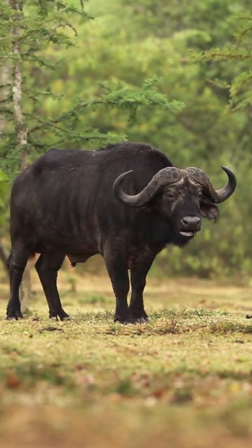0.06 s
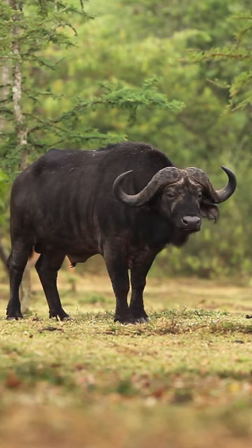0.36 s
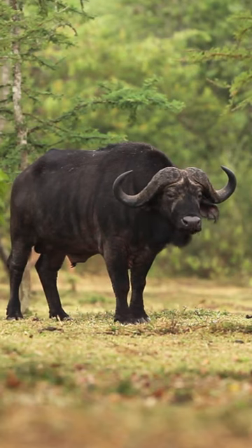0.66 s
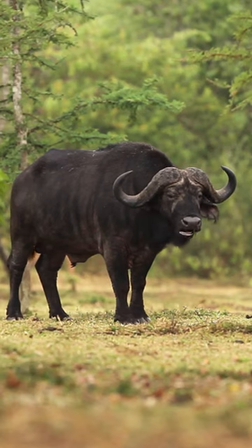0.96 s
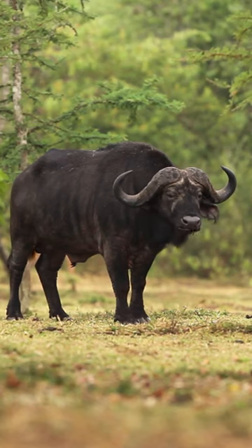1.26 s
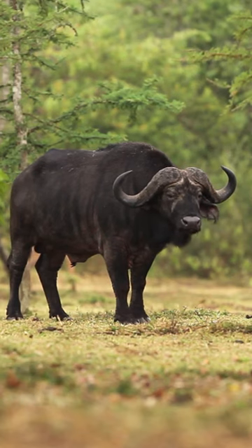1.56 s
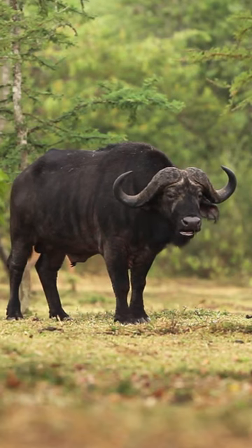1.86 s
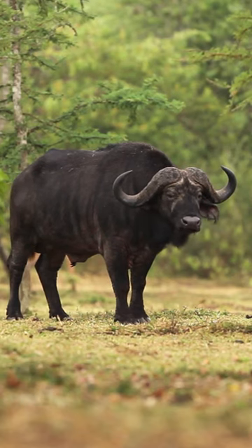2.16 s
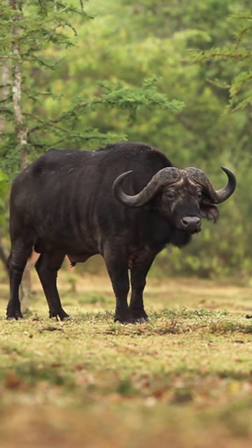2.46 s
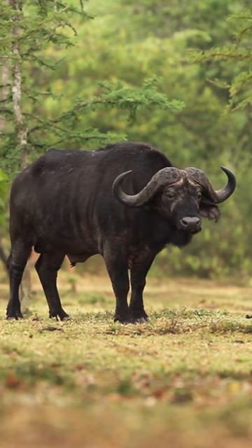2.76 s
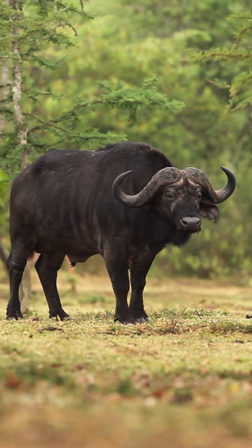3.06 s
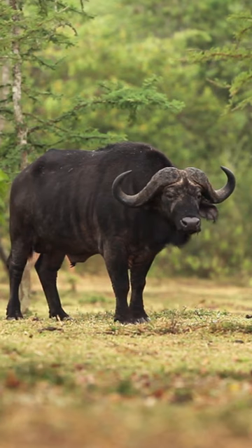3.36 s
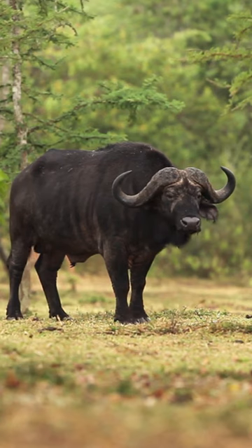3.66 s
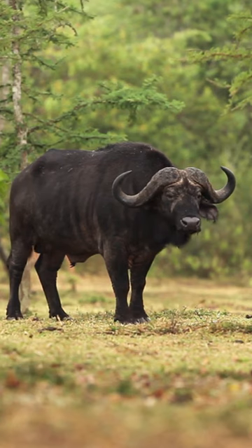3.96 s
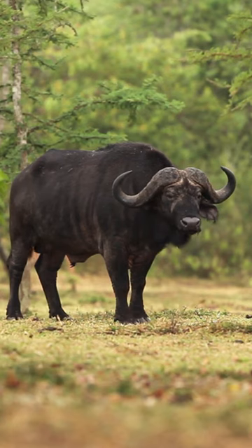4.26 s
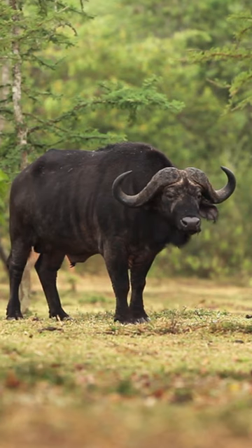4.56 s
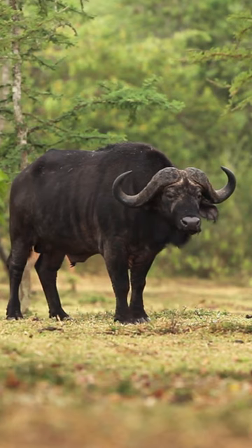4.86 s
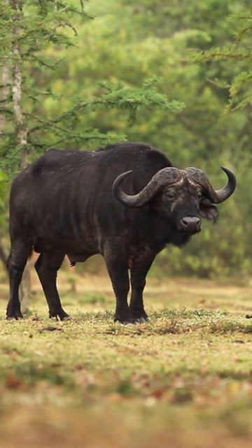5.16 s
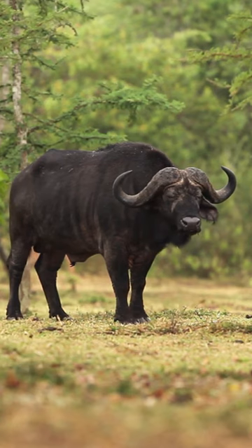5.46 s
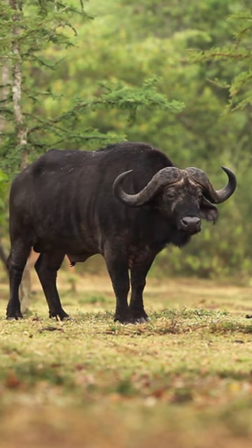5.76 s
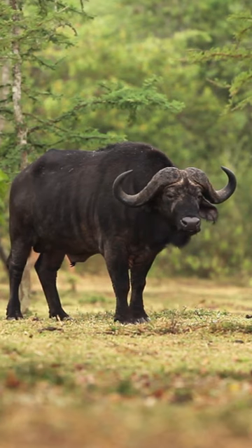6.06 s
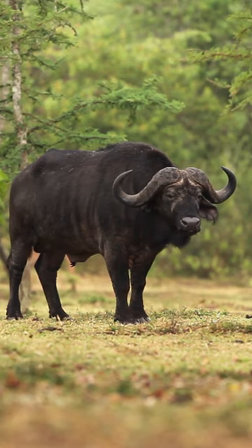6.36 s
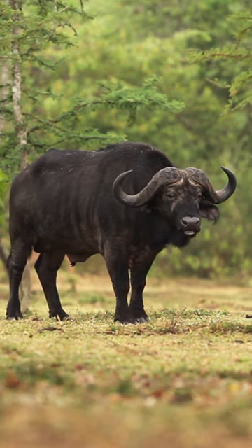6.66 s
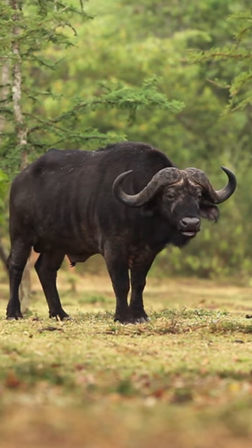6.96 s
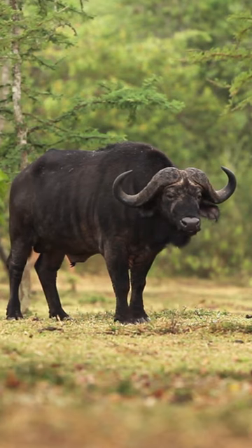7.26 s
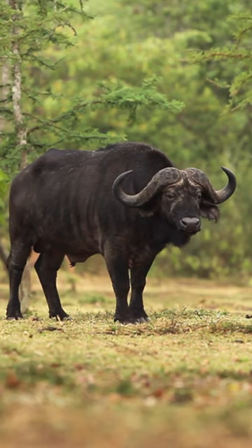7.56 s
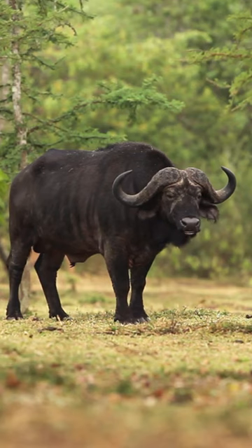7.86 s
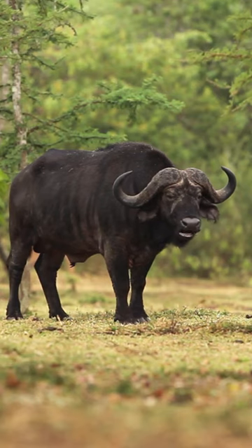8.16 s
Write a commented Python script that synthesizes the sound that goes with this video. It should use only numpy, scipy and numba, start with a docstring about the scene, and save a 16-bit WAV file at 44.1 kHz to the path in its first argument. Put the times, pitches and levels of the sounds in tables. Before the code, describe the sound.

Birds chirp and trill on both sides at the edge of a wood, over a soft hush and a faint low rumble. Straight ahead, a buffalo quietly chews grass, then gives two loud, deep, rattling calls with a short pause between them. The first swells gradually, and the second is breathier. Afterwards the birds carry on and the faint chewing returns.

```python
"""Buffalo at a wood's edge

A buffalo chews and gives two deep, rattling calls. Its vocal folds slap about 22 times a second,
a pulse train that excites the resonances of chest, throat and mouth; air rasps after each slap.
Birds chirp on both sides, their tones scattered by the trees, over a low rumble and the wood's hush."""
import sys
import numpy as np
from scipy import signal
from scipy.fft import rfft, irfft, next_fast_len
from scipy.io import wavfile
from scipy.ndimage import uniform_filter1d, minimum_filter1d
from numba import njit

SR = 44100
rng = np.random.default_rng(int(sys.argv[2]) if len(sys.argv) > 2 else 0)


def int16_out(signal):
    """Quantize to a 16-bit WAV file."""
    q = np.round(np.clip(np.atleast_2d(signal).T, -1, 1) * 32767)
    wavfile.write(sys.argv[1], SR, q.astype(np.int16))


N = 367353
T = np.arange(N) / SR

# vocal fold rate through each call (time [s], rate [slaps/s])
FOLD_RATE_1 = [(2.665, 21.64), (2.85, 21.25), (3.1, 21.67), (3.22, 22.44), (3.6, 22.29), (3.85, 22.53),
               (4.03, 22.08), (4.15, 21.07)]
FOLD_RATE_2 = [(4.931, 21.95), (5.0, 19.97), (5.1, 21.28), (5.4, 22.51), (5.6, 22.24), (5.85, 21.81),
               (6.05, 23.04), (6.4, 22.47), (6.64, 20.87)]
# how hard each call is pushed (time [s], throat drive [dB], chest drive [dB])
EFFORT_1 = [(2.66, -56, -60), (2.76, -42, -36.5), (3.17, -38.5, -29), (3.27, -30.5, -28), (3.41, -16, -38),
            (3.8, -12, -28), (3.935, -12, -23.5), (4.12, -20.5, -17)]
EFFORT_2 = [(4.93, -40, -34), (5.07, -29, -14.5), (5.13, -33, -24), (5.19, -26.5, -24), (5.44, -23.5, -19),
            (5.56, -16.5, -19.5), (5.71, -24, -19.5), (5.89, -36, -26), (6.025, -14.5, -24),
            (6.16, -8.5, -26), (6.33, -14.5, -19.5), (6.43, -19, -24), (6.61, -24, -15)]
# the throat lengthens and shortens (time [s], second resonance [Hz])
TUNING_1 = [(2.66, 560), (3.15, 512), (3.4, 474), (3.75, 452), (3.95, 465.5), (4.13, 453)]
TUNING_2 = [(5.1, 440), (5.2, 394), (5.6, 398), (5.8, 387), (6.03, 406), (6.3, 426), (6.6, 446)]
# mouth resonances at rest (frequency [Hz], bandwidth [Hz], relative level [dB])
MOUTH_MODES_1 = [(821, 86, 1), (909, 130, 7), (1010, 98, 5.5), (1200, 160, -0.5), (1390, 68, -2.5),
                 (1580, 150, -17)]
MOUTH_MODES_2 = [(668, 19, 12), (873, 125, 12.5), (988, 27, 4), (1353, 58, 9.5), (1573, 89, 8.5),
                 (1780, 190, -21)]
# slaps that knock harder in the mouth (time [s], boost [dB])
HARD_SLAPS = [(2.853, 4), (3.716, 2), (3.936, 0.5), (3.981, 2.5), (4.07, 3), (4.118, 7.5), (6.068, 5),
              (6.201, 3), (6.245, 4), (6.334, 4)]
# hiss of air through the muzzle (frequency [Hz], relative level [dB])
HISS_SPECTRUM = [(300, -34.5), (650, -18), (900, 6.5), (2200, 4.5), (3600, -7), (4400, -8), (5200, -8),
                 (6500, -16), (8800, -20.5), (12000, -27), (16000, -35)]
# gusts in the throat (start [s], duration [s], resonance [Hz], nominal bandwidth [Hz], level [dB])
THROAT_GUSTS = [(4.12, .11, 330, 350, -37), (4.92, .07, 115, 30, -34), (4.95, .08, 280, 200, -43),
                (5.15, .12, 880, 90, -40), (5.168, .018, 850, 160, -28), (6.61, .07, 330, 200, -43)]
# jaw strokes (start [s], duration [s], level [dB])
JAW_STROKES = [(.34, 0.18, -46.5), (1.24, 0.19, -47.5), (2.25, 0.16, -49), (8.2, 0.16, -46)]
# resonances of the closed mouth (frequency [Hz], bandwidth [Hz], relative level [dB])
CLOSED_MOUTH_MODES = [(323, 87, 5), (807, 170, -3.5)]
# grass crunching between the teeth (start [s], duration [s], level [dB])
GRASS_CRUNCHES = [(.25, 0.093, -52.5), (.77, 0.084, -51), (.85, 0.05, -48.5), (1.73, 0.08, -52.5),
                  (1.8, 0.047, -48), (7.63, 0.056, -54), (7.73, 0.048, -50)]
# bird notes (start [s], duration [s], kind, pitch [Hz], level [dB], left minus right [dB])
BIRD_NOTES = [(.188, 0.11, "arch", 2653, -36.5, -7), (0.306, .12, "droop", 2290, -43.5, -8.5),
              (0.797, 0.076, "fall", 3350, -47.5, 11), (.8, 0.14, "lift", 2666, -39, -6),
              (0.902, 0.046, "arch", 3800, -45, -8), (0.923, 0.065, "swoop", 2906, -33, -7.5),
              (0.964, 0.036, "rise", 2644, -40.5, -10.5), (0.999, 0.046, "droop", 4420, -53, -3),
              (1.131, 0.033, "fall", 6250, -55.5, -19), (1.271, 0.03, "swoop", 5640, -48.5, -2),
              (1.376, .043, "fall", 2890, -40, -6), (1.385, 0.08, "rise", 3464, -41.5, -1.5),
              (1.463, 0.079, "droop", 2082, -40.5, -3), (1.53, 0.052, "dip", 4420, -46, -4),
              (1.574, 0.038, "dip", 4840, -38, -3), (1.618, 0.027, "dip", 4860, -36, -3),
              (1.659, 0.027, "dip", 5080, -38, -1), (1.78, 0.079, "hook", 2830, -48.5, -5),
              (1.907, 0.11, "swoop", 2946, -39.5, -0.5), (1.973, 0.078, "hook", 3350, -43.5, -4),
              (2.034, 0.059, "fall", 3180, -37.5, -6), (2.153, 0.038, "arch", 4830, -41.5, -2),
              (2.176, .1, "sag", 3825, -35.5, -1.5), (2.37, 0.087, "swoop", 2640, -49, -18),
              (2.472, 0.1, "arch", 2357, -38, -8), (2.573, 0.1, "hook", 2780, -30, -4.5),
              (2.614, 0.072, "lift", 3760, -37.5, -4.5), (2.681, 0.073, "swoop", 3680, -41, -2),
              (2.979, 0.063, "hook", 2314, -37.5, -11.5), (3.035, 0.037, "sag", 3210, -42.5, -16),
              (3.044, 0.076, "droop", 2200, -40, -6), (3.152, 0.028, "arch", 2870, -31.5, -10),
              (3.164, 0.059, "vee", 2760, -33, -7.5), (3.535, 0.097, "hook", 3110, -47.5, 10),
              (3.791, 0.084, "arch", 2500, -35.5, -9), (3.886, 0.089, "droop", 2550, -36, -7.5),
              (4.248, 0.053, "held", 6160, -56.5, 6), (4.368, 0.039, "sag", 3590, -39.5, -3),
              (4.427, 0.065, "vee", 2920, -39, -18), (4.502, 0.12, "climb", 2195, -50.5, 8),
              (4.478, .43, "held", 3925, -46, 11.5), (4.669, 0.094, "sag", 2660, -53, 8),
              (4.914, 0.048, "rise", 2297, -42.5, -8), (4.973, 0.033, "sag", 3120, -36.5, -5),
              (4.976, 0.075, "sag", 4960, -47, 11), (4.983, 0.054, "droop", 2210, -45, -9),
              (5.068, 0.071, "sag", 4870, -45.5, 9), (5.082, .076, "vee", 2700, -33.5, -10),
              (5.164, .2, "rise", 4050, -40, 16.5), (5.388, 0.074, "fall", 4110, -40.5, 15),
              (5.469, 0.12, "dip", 4720, -46, -3), (5.559, 0.082, "fall", 3440, -37.5, -4),
              (5.618, .15, "sag", 4100, -49, 15), (5.824, 0.14, "swoop", 4020, -43.5, 1),
              (5.79, 0.13, "rise", 7300, -62, 2.5), (6.025, 0.079, "arch", 2707, -33, -7),
              (6.19, 0.051, "arch", 4760, -42, -3.5), (6.231, 0.081, "rise", 4185, -42, -4.5),
              (6.272, 0.13, "sag", 2290, -46, 19), (6.379, 0.056, "fall", 3600, -42.5, -3.5),
              (6.434, .035, "droop", 3460, -44, -4), (6.47, .04, "droop", 3470, -47, -5),
              (6.516, 0.047, "droop", 3390, -44, -5), (6.559, 0.064, "fall", 3920, -43.5, 18),
              (6.553, 0.14, "lift", 2730, -34, -7.5), (6.666, 0.026, "arch", 3670, -39.5, -11),
              (6.68, 0.064, "swoop", 2640, -33.5, -3), (6.751, 0.13, "sag", 2497, -48, 13),
              (7.106, 0.076, "arch", 2330, -38, -8), (7.191, 0.09, "hook", 2843, -30, -5),
              (7.3, 0.079, "sag", 2300, -44.5, 10), (7.31, 0.1, "sag", 2940, -50, 7),
              (7.385, 0.071, "sag", 2390, -47, 24), (7.63, 0.041, "lift", 3340, -43, -8),
              (7.668, 0.075, "fall", 5030, -49.5, -6), (7.74, 0.051, "vee", 3260, -40.5, -3),
              (8.063, 0.16, "climb", 2527, -39, -11.5), (8.213, .1, "hook", 2950, -39.5, -5),
              (8.2, 0.086, "sag", 6370, -61, -14)]
# bird trills (start [s], duration [s], pitch [Hz], deviation [Hz], modulation rate [Hz],
# level [dB], left minus right [dB])
BIRD_TRILLS = [(0.183, 0.22, 5660, 90, 75, -63, 0), (1.547, 0.15, 5210, 590, 54, -48, -1),
               (2.286, 0.38, 5540, 345, 12.7, -62.5, 1), (5.56, 0.25, 4080, 330, 125, -44.5, 12),
               (6.423, 0.14, 3460, 413, 22, -45.5, -3.5)]
# contour of each kind of note (four successive pitches [semitones], swell from start to end [dB])
NOTE_CONTOURS = {"arch": ((-5, 0.84, 1, -3), 2.5), "hook": ((-1.4, 1.2, -0.22, -1.4), 3.1),
                 "droop": ((1.5, 1, -1.5, -6.5), -2.5), "fall": ((5.5, 1.6, -1.2, -3.5), 8.1),
                 "swoop": ((5.5, -0.5, -3.5, -.5), 0), "dip": ((1.1, -0.83, -0.8, 1.4), -5.5),
                 "vee": ((3.5, -1.3, -3, 4.5), 3.6), "rise": ((-2.5, -0.1, .5, -0.7), 6),
                 "lift": ((0, 0, 1.57, 6), 3.2), "sag": ((0.91, 0, -.4, -0.78), -1),
                 "climb": ((-3.5, -1.2, 0.8, 4.5), 5), "held": ((0.041, 0.1, -0.028, -0.16), 10)}
# overtones of a bird note (harmonic number, relative level [dB])
BIRD_HARMONICS = [(2, -32), (3, -23), (4, -26)]
# low rumble, sinking during the first call and returning after the second (time [s], level [dB])
RUMBLE_LEVEL = [(0, -46.5), (.25, -41), (.55, -49.5), (1.1, -45), (2.8, -44), (4.2, -76), (6.65, -80.5),
                (6.8, -50.5), (7.5, -52.5), (7.65, -45), (8.33, -42.5)]
# far birds merging into a chorus (time [s], level [dB])
CHORUS_LEVEL = [(0, -59.5), (1.6, -53.5), (3.1, -55.5), (4.3, -64.5), (5.4, -51), (6.5, -52.5), (7, -57.5),
                (8.33, -63.5)]
# background spectra (frequency [Hz], relative level [dB])
RUMBLE_SPECTRUM = [(15, -10.5), (30, 1), (45, 1.5), (65, -7.5), (100, -12.5), (150, -21), (250, -26),
                   (500, -32), (1200, -36), (3000, -58.5)]
CHORUS_SPECTRUM = [(1200, -30), (2000, -2), (2700, 3.5), (3800, 0.5), (4600, -5), (5600, -19.5),
                   (7000, -29.5)]
HUSH_SPECTRUM = [(59, -30.5), (100, -6), (156, -5.5), (420, -5.5), (668, -11.5), (1490, -10.5), (1960, -7),
                 (2810, -3.5), (3850, -35.5), (5070, -16.5), (7410, -24.5), (8230, -17.5), (10600, -24),
                 (14500, -22), (15500, -43)]


def buffalo():
    """Source and filter: a swelling call, then a breathier one, with brief scattering from the trees."""
    first = call(
        FOLD_RATE_1, EFFORT_1, TUNING_1, closes_s=0.017, opens_s=0.25, open_mouth_db=5,
        throat=dict(open_rise_hz=69.5, second_db=-18, soft_hz=298, churn_db=-1),
        mouth=dict(modes=MOUTH_MODES_1, rest_hz=465, stretch=0.9, top_hz=1843,
                   gain_db=-19.5, rasp_db=-5, clack_db=-8.5, leak=0.29, gust=0.13),
        muzzle=dict(gain_db=-32.5, leak=0.15, nostril_db=0.5))
    second = call(
        FOLD_RATE_2, EFFORT_2, TUNING_2, closes_s=0.24, opens_s=0.26, open_mouth_db=-5.5,
        throat=dict(open_rise_hz=25, second_db=-21, soft_hz=199, churn_db=-4.5),
        mouth=dict(modes=MOUTH_MODES_2, rest_hz=412, stretch=1.25, top_hz=1790,
                   gain_db=-20.5, rasp_db=-4, clack_db=-3.5, leak=0.24, gust=0.036),
        muzzle=dict(gain_db=-44.5, leak=0.62, nostril_db=-12))
    voice = first + second + grunts()
    return voice + undb(-13.5) * scatter(band(voice, 220, 6000, order=2), t60=0.16)


def call(rate, effort, tuning, closes_s, opens_s, open_mouth_db, throat, mouth, muzzle):
    """Impulse excitation: each slap rings chest and throat and lets a burst of air through the mouth."""
    start, end = rate[0][0], rate[-1][0]
    folds = vocal_folds(rate)
    throat_db, chest_db = curves(effort)
    second_hz, = curves(tuning)
    # the throat is slack at first, closes for the body of the call and opens at its end
    ending = ramp(end - opens_s, opens_s)
    slack = 1 - ramp(start + closes_s, 0.032) + ending
    body = chest_and_throat(folds, throat_db, chest_db, second_hz, slack, ending, **throat)
    flow = uniform_filter1d(folds["sounding"] * 1.0, 900) * undb(3.6 * walk(160))
    push = undb(throat_db + open_mouth_db * ending + knocks())
    loose = ramp(5.15, 0.0066) * (1 - ramp(6.33, 0.072))  # air escapes freely in the second call
    rasp = mouth_rasp(folds, flow, push, loose, second_hz, **mouth)
    return body + rasp + muzzle_hiss(folds, flow, push, loose, **muzzle)


def vocal_folds(rate):
    """Periodic closure: a unit-power impulse train, with the timing of the folds' cycle."""
    start, end = rate[0][0], rate[-1][0]
    hz, = curves(rate)
    sounding = (T >= start) & (T < end)
    cycles = np.cumsum(hz * sounding) / SR
    closures = np.diff(np.ceil(cycles), prepend=0)
    since_s = T - np.maximum.accumulate(T * closures)
    apart = np.clip((since_s - 0.026) / 0.0043, 0, 1)  # the folds part late in each cycle
    slaps = closures * np.sqrt(SR / hz)
    return dict(slaps=slaps, since_s=since_s, apart=apart, sounding=sounding, started=T >= start)


def chest_and_throat(folds, throat_db, chest_db, second_hz, slack, ending,
                     open_rise_hz, second_db, soft_hz, churn_db, full_db=-11, weak_db=-22):
    """Damped resonance: one chest mode and two throat modes ring down after every slap."""
    slaps = folds["slaps"] * undb(0.5 * walk(20))
    drive = slaps * undb(throat_db + 1.5)
    chest = band(ring(slaps * undb(chest_db), hz=48.5, width_hz=19)[0], 34, 100, order=1)
    # the first throat resonance sinks as the effort drops
    first_hz = 0.3064 * second_hz + 1.1 * (throat_db - full_db) + open_rise_hz * ending
    width_hz = 19.9 + 62 * slack
    windpipe_hz = 30 * folds["apart"]  # parted folds let the windpipe damp the ringing
    first = ring(drive, first_hz, width_hz + windpipe_hz)[1]
    low = band(chest + first, 28, soft_hz, order=1)  # gradual closure softens the low resonances
    # air churns after each slap, so that no two ring alike
    churn = rng.standard_normal(N) * np.exp(-folds["since_s"] / 0.027) * folds["sounding"]
    churn *= undb(throat_db + churn_db)
    # the second resonance only ticks when weakly driven; an open throat lifts it
    damping_hz = 11 + 0.36 * width_hz + 0.5 * windpipe_hz + 2.5 * np.maximum(weak_db - throat_db, 0)
    second = ring((drive + churn) * undb(second_db + 11 * slack), second_hz, damping_hz)[0]
    low -= 0.25 * pick(low, hz=283, width_hz=110)  # the nasal side branch absorbs a band
    low += undb(2) * band(churn, 170, 400, order=3)
    return band(low, 8, 1800, order=2) + band(second, 383, 570, order=2)


def mouth_rasp(folds, flow, push, loose, second_hz,
               modes, rest_hz, stretch, top_hz, gain_db, rasp_db, clack_db, leak, gust):
    """Formant filtering: slaps and rough air excite mouth modes that shift as the neck stretches."""
    burst = np.exp(-folds["since_s"] / 0.009) * folds["started"]
    leakage = (leak + gust * folds["apart"]) * flow
    rasp = 2 * (burst + leakage) * rng.standard_normal(N)
    strength = np.hypot(push * undb(gain_db), loose * undb(-48.5)) * undb(1.8 * walk(22))
    source = (undb(clack_db) * folds["slaps"] + undb(rasp_db) * rasp) * strength
    formants = resonate(source, modes, shift_hz=stretch * (second_hz - rest_hz))
    return band(formants, 0.897 * modes[0][0], top_hz, order=5)


def muzzle_hiss(folds, flow, push, loose, gain_db, leak, nostril_db):
    """Flow noise: air bursts out at each slap, leaks on between slaps and rings in the nostrils."""
    burst = uniform_filter1d(np.exp(-folds["since_s"] / 0.007) * folds["started"], size=40)
    strength = np.hypot(push * undb(gain_db), loose * undb(-51))
    air = 2 * (burst + leak * flow) * noise(HISS_SPECTRUM) * strength
    return air + undb(nostril_db) * pick(air, hz=5340, width_hz=260)


def knocks(lead_s=0.0034, decay_s=0.021):
    """Transient emphasis: a brief boost in dB at each hard slap."""
    return sum(boost_db * ramp(s - lead_s, 0.0024) * np.exp(-((T - s) / decay_s) ** 2)
               for s, boost_db in HARD_SLAPS)


def grunts():
    """Unvoiced excitation: gusts of air sound a throat resonance near the edges of the calls."""
    out = np.zeros(N)
    for s, length, hz, width_hz, db in THROAT_GUSTS:
        mode = [(hz, 2 * width_hz, 0)]
        gust = resonate(resonate(rng.standard_normal(N), mode), mode)
        out += gust * np.sqrt(4 * np.pi * width_hz / SR) * swells([(s, length, db)])
    return out


def chewing():
    """Cavity filtering: the closed mouth muffles the grinding; grass crackles between the teeth."""
    grind = band(resonate(rng.standard_normal(N), CLOSED_MOUTH_MODES), 200, 1600, order=2)
    grind *= undb(2.2 * walk(70))
    grains = rng.standard_normal(N) * undb(5.1 * walk(300))
    crackle = unit(band(grains, 290, 2400, order=2))
    return grind * swells(JAW_STROKES) + crackle * swells(GRASS_CRUNCHES)


def birds(ear_lag_s=0.00024):
    """Interaural time and level differences: each note reaches the nearer ear first and louder."""
    notes = [(s, chirp(*row), pan_db) for s, *row, pan_db in BIRD_NOTES]
    notes += [(s, trill(*row), pan_db) for s, *row, pan_db in BIRD_TRILLS] + chatter()
    direct = np.zeros((2, N + SR))
    for s, note, pan_db in notes:
        for ear, side in enumerate((1, -1)):
            i = int(s * SR) + round(ear_lag_s * SR) * int(side * pan_db < 0)
            direct[ear, i:i + len(note)] += note * np.sqrt(2 / (1 + undb(-side * pan_db) ** 2))
    return among_trees(direct[:, :N])


def chirp(length, kind, pitch_hz, db):
    """Frequency glide: a note follows its contour; the narrower the glide, the purer the tone."""
    semitones, swell_db = NOTE_CONTOURS[kind]
    progress = np.linspace(0, 1, int(length * SR))
    contour = np.polyfit(np.linspace(0, 1, 4), semitones, 3)
    hz = pitch_hz * 2 ** (np.polyval(contour, progress) / 12)
    agility = np.clip(np.ptp(hz) / 900, 0.1, 1)
    return whistle(hz, db, swell_db, waver=0.02 * agility, flutter_db=1 + 2.5 * agility,
                   overtones=agility, edge=min(0.2, 0.04 / length))


def trill(length, hz, deviation_hz, rate_hz, db):
    """Frequency modulation: the pitch swings quickly up and down."""
    t = T[:int(length * SR)]
    return whistle(hz + deviation_hz * np.sin(2 * np.pi * rate_hz * t), db)


def whistle(hz, db, swell_db=0, waver=0.016, flutter_db=3.1, overtones=1, edge=0.19):
    """Random modulation: jitter makes a bird's tone slightly hoarse and smears its faint harmonics."""
    size = len(hz)
    progress = np.linspace(0, 1, size)
    hz = hz * (1 + waver * walk(600, size))
    phase = 2 * np.pi * np.cumsum(hz) / SR
    harmonics = sum(undb(level_db) * np.sin(k * phase) * np.clip((13000 - k * hz) / 1000, 0, 1)
                    for k, level_db in BIRD_HARMONICS)
    tone = np.sin(phase) + overtones * walk(900, size) * harmonics
    fade = np.sin(np.pi / 2 * np.clip(np.minimum(progress, 1 - progress) / edge, 0, 1)) ** 2
    swell = undb(swell_db * progress + flutter_db * walk(83.8, size))
    return undb(db) * unit(tone * fade * swell)


def chatter(count=190, db=-59, low_hz=2200, range_hz=1700):
    """Random arrivals: faint notes from deeper in the wood (start [s], sound, left minus right [dB])."""
    notes, kinds = [], list(NOTE_CONTOURS)
    for when, length, height, side, choice in rng.random((count, 5)):
        s = when * T[-1]
        busy_db = np.interp(s, *np.transpose(CHORUS_LEVEL)) - np.mean(CHORUS_LEVEL, axis=0)[1]
        kind = kinds[int(choice * len(kinds))]
        note = chirp(0.05 + 0.07 * length, kind, low_hz + range_hz * height, db + busy_db)
        notes.append((s, note, 20 * side - 12))
    return notes


def among_trees(direct, trunk_s=0.019):
    """Multipath propagation: direct sound, one trunk's clear echo, then near and far reverberation."""
    mixed = 0.8 * direct + 0.2 * direct[::-1]  # echoes from all around are more even between the ears
    near = np.array([scatter(ear, t60=0.18) for ear in mixed])
    far = np.array([scatter(ear, t60=0.7) for ear in mixed])
    trunk = np.roll(mixed, round(trunk_s * SR), axis=1) * (T > trunk_s)
    return undb(0.65) * direct + undb(-12) * trunk + undb(-7) * near + undb(-11) * far


def scatter(x, t60):
    """Diffuse scattering: dense reflections from trunks and leaves fall 60 dB in t60 seconds."""
    t = T[:SR]
    echo = rng.standard_normal(SR) * undb(-60 * t / t60) * (1 - np.exp(-t / 0.0066))
    return signal.fftconvolve(x, echo / np.sqrt(np.sum(echo ** 2)))[:N]


def wood(hush_db=-58, pan_db=-4, spread=0.74, left_lag_s=0.00019):
    """Partial coherence: rumble, hush and far birds form a wide field, a little to the right."""
    rumble = noise(RUMBLE_SPECTRUM) * undb(curves(RUMBLE_LEVEL)[0] + 3.2 * walk(14))
    chorus_db, = curves(CHORUS_LEVEL)
    hush = noise(HUSH_SPECTRUM) * undb(hush_db)
    chorus = noise(CHORUS_SPECTRUM) * undb(chorus_db + 2 * walk(32))
    coherent = rumble + hush + chorus
    diffuse = [noise(CHORUS_SPECTRUM) * undb(chorus_db + 2 * walk(20))
               + noise(HUSH_SPECTRUM) * undb(hush_db) for _ in range(2)]
    left = np.roll(coherent, round(left_lag_s * SR)) + spread * diffuse[0]
    right = coherent + spread * diffuse[1]
    return np.array([left * undb(pan_db / 2), right * undb(-pan_db / 2)])


@njit
def resonator(x, hz, width_hz):
    """Driven oscillator with moving tuning: its velocity (band-pass) and displacement (low-pass)."""
    y, band_state, low_state = np.empty((2, len(x))), 0.0, 0.0
    for i in range(len(x)):
        step, loss = np.tan(np.pi * hz[i] / SR), width_hz[i] / hz[i]
        velocity = (band_state + step * (x[i] + 1e-18 - low_state)) / (1 + step * (step + loss))
        y[0, i], y[1, i] = loss * velocity, loss * (low_state + step * velocity)
        band_state, low_state = 2 * velocity - band_state, low_state + 2 * step * velocity
    return y


def ring(x, hz, width_hz):
    """Resonance that keeps the power of a flat input, whatever its bandwidth."""
    width_hz = np.maximum(width_hz, 2) * np.ones(N)
    return resonator(x * np.sqrt(SR / (np.pi * width_hz)), hz * np.ones(N), width_hz)


def resonate(x, modes, shift_hz=0):
    """Modal superposition: resonances that shift together and roughly keep a flat input's power."""
    power = sum(undb(db) ** 2 for _, _, db in modes)
    return sum(undb(db) * ring(x, hz + shift_hz, width)[0] for hz, width, db in modes) / np.sqrt(power)


def pick(x, hz, width_hz):
    """Resonant selection of one band, with gain 1 at its centre."""
    return resonator(x, np.full(N, float(hz)), np.full(N, float(width_hz)))[0]


def band(x, low_hz, high_hz, order):
    """Maximally flat band-pass filtering."""
    return signal.sosfilt(signal.butter(order, [low_hz, high_hz], "band", fs=SR, output="sos"), x + 1e-18)


def noise(spectrum):
    """Spectral shaping: noise of rms 1 coloured by (frequency [Hz], level [dB]) rows."""
    hz, db = np.transpose(spectrum)
    size = next_fast_len(N)
    bins_hz = np.maximum(np.fft.rfftfreq(size, 1 / SR), 1)
    gain = undb(np.interp(np.log(bins_hz), np.log(hz), db))
    return unit(irfft(rfft(rng.standard_normal(size)) * gain, size)[:N])


def walk(rate_hz, size=N):
    """Random fluctuation: straight lines between normal draws."""
    position = np.arange(size) * rate_hz / SR
    count = int(position[-1]) + 2
    return np.interp(position, np.arange(count), rng.standard_normal(count))


def swells(table):
    """Half-sine envelopes from (start [s], duration [s], level [dB]) rows."""
    return sum(undb(db) * np.sin(np.pi * ramp(s, length)) for s, length, db in table)


def curves(table):
    """Linear interpolation of each column through time."""
    times, *columns = np.transpose(table)
    return [np.interp(T, times, column) for column in columns]


def ramp(start_s, length_s):
    """Linear rise from 0 to 1."""
    return np.clip((T - start_s) / length_s, 0, 1)


def undb(db):
    """Decibels to amplitude ratio."""
    return 10 ** (np.asarray(db) / 20)


def unit(x):
    """Normalisation to rms 1."""
    return x / np.sqrt(np.mean(x ** 2))


def scene():
    """Superposition: the buffalo straight ahead, the wood around it."""
    return buffalo() + chewing() + birds() + wood()


def record(dry, top_hz=15400):
    """Peak limiting near full scale, then a steep low-pass."""
    headroom = 1 / np.maximum(np.abs(dry).max(axis=0), 1)
    gain = uniform_filter1d(minimum_filter1d(headroom, size=200), size=200)
    return signal.sosfilt(signal.ellip(8, 0.2, 70, top_hz, fs=SR, output="sos"), dry * gain)


dry = scene()
out = record(dry)
int16_out(out)
```